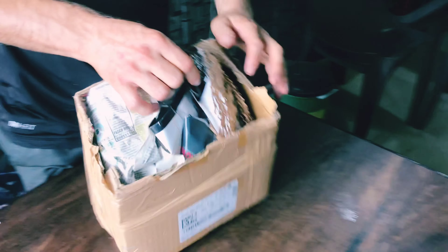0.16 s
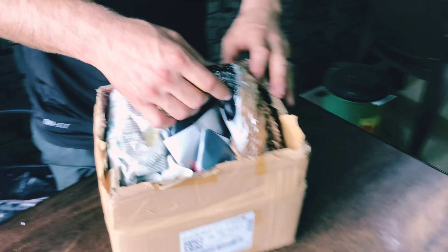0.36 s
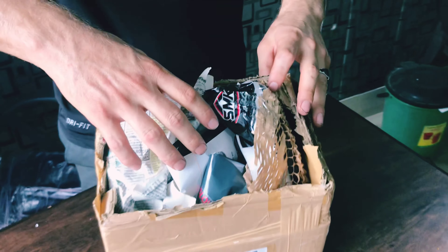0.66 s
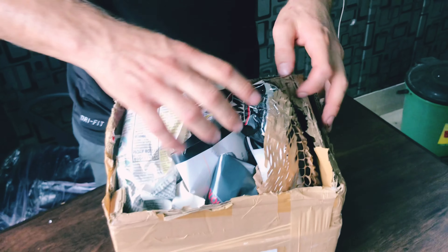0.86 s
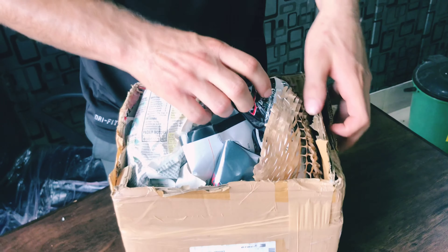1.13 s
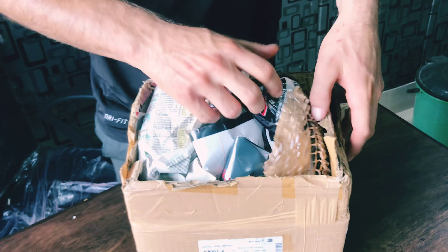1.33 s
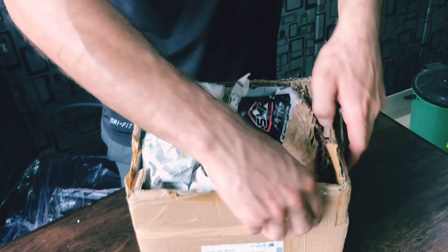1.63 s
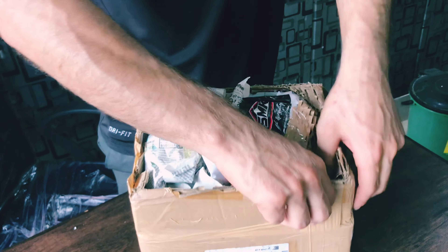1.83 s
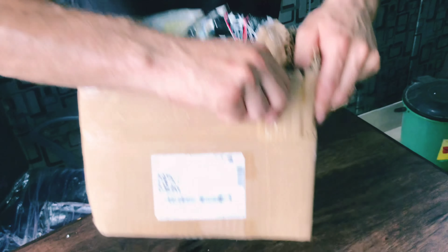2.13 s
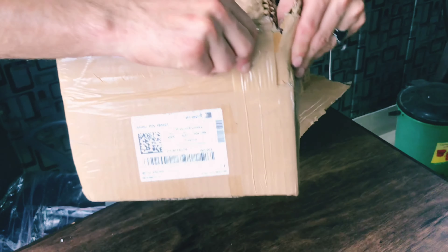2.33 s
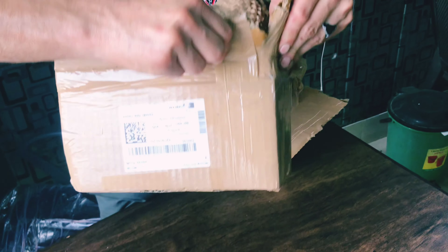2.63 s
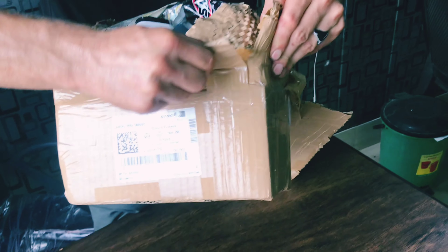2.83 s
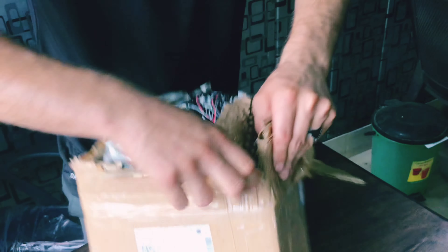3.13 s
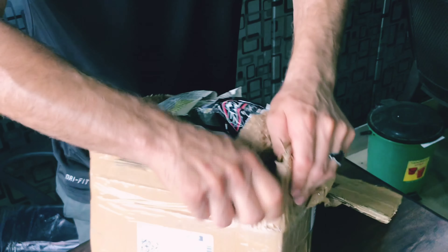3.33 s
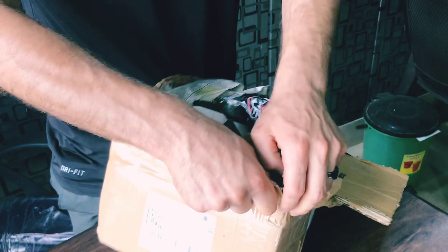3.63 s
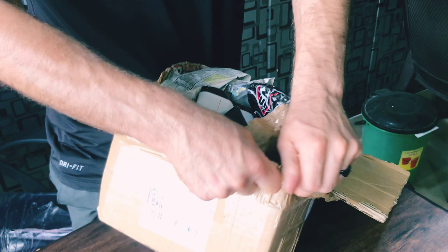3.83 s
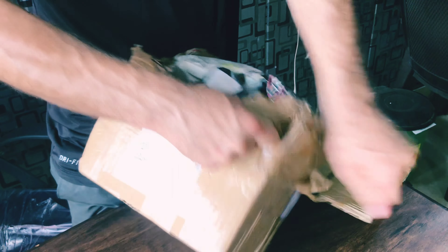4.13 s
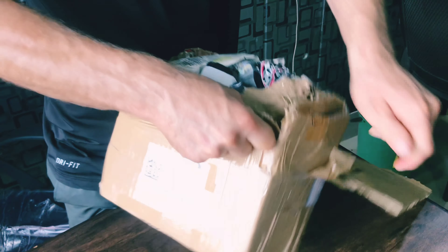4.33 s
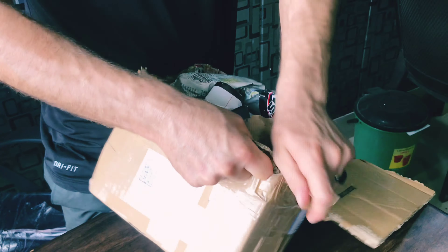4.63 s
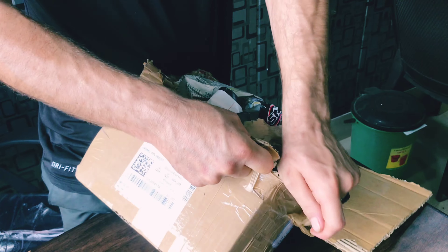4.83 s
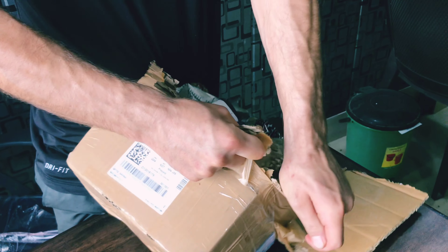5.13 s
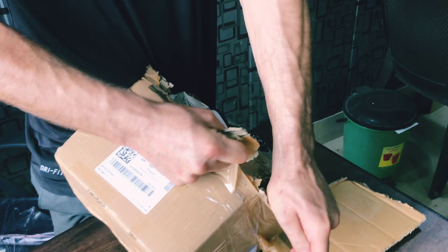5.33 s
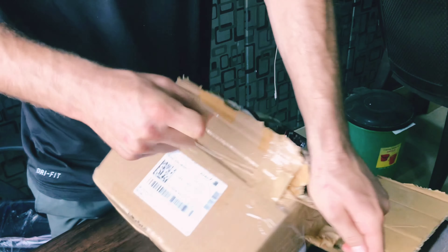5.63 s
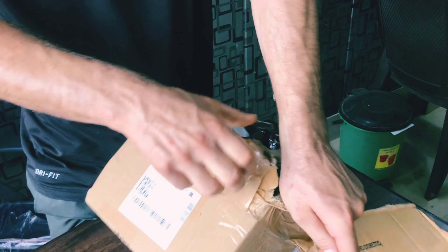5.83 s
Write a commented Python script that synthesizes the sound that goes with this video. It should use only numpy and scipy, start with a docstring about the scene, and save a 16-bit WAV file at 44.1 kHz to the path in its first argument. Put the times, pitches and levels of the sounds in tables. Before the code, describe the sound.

Papery friction and tiny crackles run almost throughout, swelling with each pull. Sharp cardboard snaps cut through, loudest around the middle and near the end, with hollow box booms and soft low table thuds beneath. A close microphone catches short dense room echoes over faint steady rumble and hiss.

```python
"""Sharp snaps over a papery rustle: two hands tear at a taped cardboard box full of newspaper.
The snaps are short noise bursts; the rustle is friction hiss mixed with tiny crackles and dry ticks.
A strip of tape squeals on a wavering tone, and the air in the box booms near 280 Hz.
The wooden table thuds near 90 Hz, its frame rings low, and a small hard room answers with dense
echoes over a faint, steady rumble and hiss."""
import sys
import numpy as np
from scipy import signal
from scipy.io import wavfile
from scipy.ndimage import uniform_filter1d

SR = 44100
rng = np.random.default_rng(int(sys.argv[2]) if len(sys.argv) > 2 else 0)


def unload_wav(signal):
    """Save mono or channel-first audio to the path in sys.argv[1] as 16-bit WAV at rate SR, clipped to [-1, 1]."""
    wavfile.write(
        sys.argv[1],
        SR,
        np.round(np.clip(np.atleast_2d(signal).T, -1, 1) * 32767).astype(np.int16),
    )


N = 263778


def from_db(db):
    """Turn decibels into a plain gain."""
    return 10 ** (np.asarray(db) / 20)


def rms_one(x):
    """Scale a sound to an average strength (rms) of 1."""
    return x / np.sqrt(np.mean(x ** 2) + 1e-20)


def in_time(rows):
    """Draw straight lines between the rows of a table, giving one value a sample for each column."""
    times, *columns = np.transpose(rows)
    return [np.interp(np.arange(N) / SR, times, column) for column in columns]


def band(x, low_hz, high_hz):
    """Keep only one range of pitches, with its top held below the highest pitch the samples can carry."""
    edges = [low_hz, min(high_hz, .45 * SR)]
    return signal.sosfilt(signal.butter(2, edges, "band", fs=SR, output="sos"), x)


def drift(rate_hz):
    """Wander slowly by chance, with spread 1: smoothed noise made at every 40th sample, then filled in."""
    r = np.exp(-80 * np.pi * rate_hz / SR)
    noise = rng.standard_normal(N // 40 + 2002)
    slow = signal.lfilter([1], [1, -2 * r, r * r], noise)[2000:]   # skip the filter's start-up
    return np.interp(np.arange(N) / 40, np.arange(len(slow)), rms_one(slow))


def resonate(x, modes):
    """Ring several modes (f/Hz, width/Hz, level/dB) side by side, signs alternating; peak gain is level + 6 dB."""
    out = 0
    for k, (hz, width_hz, level_db) in enumerate(modes):
        r = np.exp(-np.pi * width_hz / SR)
        feedback = [1, -2 * r * np.cos(2 * np.pi * hz / SR), r * r]
        ringing = signal.lfilter([1 - r * r, 0, r * r - 1], feedback, x)
        out = out + (-1) ** k * from_db(level_db) * ringing
    return out


def add(out, s, sound):
    """Mix a short sound in at time s."""
    i = max(round(s * SR), 0)
    out[i:i + len(sound)] += sound[:N - i]


def burst(noise, low_hz, high_hz, t60_s, level_db):
    """Let noise die away in a band, with its loudest millisecond at the given level."""
    dying = noise * from_db(-60 * np.arange(len(noise)) / SR / t60_s)
    part = band(dying, low_hz, high_hz)
    loudest = np.sqrt(uniform_filter1d(part ** 2, size=44).max())
    return part * from_db(level_db) / loudest


# Fibres and tape letting go; levels are before the body, wall and band gains below.
# Columns: t/s, cardboard body level/dB, body f/Hz, fibre crack level/dB, tape crackle level/dB
SNAP_EVENTS = [(0.0555, -47, 920, -37, -25), (0.117, -19, 1750, -21, -32), (0.198, -49, 1180, -21.5, -30),
               (0.2663, -22, 1090, -14, -11.5), (0.3096, -17, 930, -13.5, -23),
               (0.337, -41, 1410, -30, -39), (0.5296, -54, 2590, -28.5, -30),
               (0.567, -28, 4140, -26, -25.5), (0.601, -23, 990, -22, -19), (0.614, -31, 970, -26.5, -31),
               (0.632, -35, 980, -29, -24), (0.7077, -29, 1800, -26.5, -40),
               (0.7508, -35, 1020, -29.5, -33), (0.7695, -51, 2500, -28, -38), (0.803, -47, 2000, -33, -37),
               (0.868, -40, 950, -41, -36.5), (0.8785, -30.5, 945, -28, -37), (0.9352, -45, 2500, -32, -39),
               (1.0018, -40, 1500, -34, -36), (1.0095, -30, 2010, -28, -39), (1.02, -35, 2590, -27, -33),
               (1.0836, -15.5, 2060, -17, -21.5), (1.1065, -24, 3620, -30, -27),
               (1.146, -29, 1200, -33, -32), (1.1848, -22.5, 1780, -29, -16),
               (1.2472, -47, 2500, -28, -33.5), (1.276, -40, 3000, -30, -28), (1.341, -33, 1020, -44, -28),
               (1.358, -22.5, 1010, -23, -33), (1.372, -40, 2250, -25.5, -27), (1.382, -45, 3000, -31, -34),
               (1.4197, -29, 1260, -28, -27), (1.44, -10.5, 1055, -14, -21), (1.4777, -36, 864, -30, -28.5),
               (1.5528, -34, 1060, -27.5, -28.5), (1.646, -17, 890, -14.5, -23),
               (1.658, -19, 1020, -22, -43), (1.675, -35, 950, -26, -35), (1.7003, -50, 1610, -23.5, -24),
               (1.7399, -16.5, 930, -23, -19.5), (1.8771, -21, 2230, -34, -26),
               (1.933, -47, 1730, -29, -45), (2.0851, -12, 1980, -10, -29), (2.1122, -50, 2440, -23, -37),
               (2.1296, -13.5, 1860, -6.5, -30), (2.2097, -25, 1520, -21, -30.5),
               (2.2688, -23, 2110, -13, -32), (2.287, -48, 2550, -23, -33), (2.354, -22, 940, -20, -30),
               (2.4433, -44, 1980, -56, -26.5), (2.4561, -21.5, 1010, -29, -39),
               (2.4717, -37, 1360, -28, -28), (2.511, -17, 1000, -20, -30), (2.527, -30, 2300, -5, -8.5),
               (2.5374, 2.5, 2070, -0.5, -36), (2.544, -27, 1160, -20, -18),
               (2.7812, -17.5, 1490, -40, -24), (2.814, -17, 1680, -12, -20), (2.827, -8, 2140, -9.5, -13),
               (2.8341, -18, 1000, -7, -19.5), (2.881, -29, 2590, -18, -29),
               (2.8862, -47, 1990, -12.5, -25), (2.9213, -23, 2010, -20, -35), (2.952, -22, 1600, -45, -26),
               (2.972, -30, 1990, -23.5, -28), (3.011, -25.5, 790, -42, -45), (3.0988, -26, 1950, -18, -24),
               (3.1205, -58, 2590, -25, -21.5), (3.1662, -34, 1640, -34, -25.5),
               (3.1924, -52, 2520, -47, -29), (3.224, -25.5, 920, -45, -36), (3.235, -52, 1280, -27, -27),
               (3.284, -32, 880, -31, -30.5), (3.3268, -28.5, 790, -31, -32), (3.415, -18, 2100, -27, -35),
               (3.439, -22, 1060, -30, -42), (3.4975, -26, 1060, -28, -40), (3.52, -51, 2590, -35, -18.5),
               (3.729, -27, 1090, -31, -29), (3.879, -45, 2410, -19, -11.5),
               (3.8972, -40, 3040, -16.5, -13.5), (3.9212, -20, 2000, -9, -3), (3.981, -28, 2020, -15, -16),
               (4.0135, -56, 1610, -30, -16.5), (4.029, -16.5, 1990, -42, -46),
               (4.066, -47, 2400, -25.5, -35), (4.1177, -28, 1900, -19.5, -27),
               (4.137, -22, 2250, -18.5, -28), (4.163, -39, 1540, -16, -20),
               (4.1699, -12.5, 1800, -10, -19.5), (4.187, -21, 1500, -27, -16),
               (4.283, -54, 2440, -16.5, -16.5), (4.2946, -42, 2550, -21, -8), (4.3, -26, 1610, -13.5, -50),
               (4.474, -29, 2070, -30, -35.5), (4.531, -18.5, 1370, -25.5, -40),
               (4.591, -27, 1300, -27, -43), (4.6784, -22.5, 2120, -51, -52), (4.6896, -40, 1360, -23, -35),
               (4.777, -45, 3000, -28, -32), (4.889, -54, 1070, -26, -54), (4.957, -18, 1490, -42, -53),
               (4.9756, -31.5, 700, -34, -27.5), (5.061, -21, 2000, -40, -27),
               (5.067, -29, 3040, -19.5, -25), (5.0782, -15, 1570, -45, -34), (5.0866, -18, 2500, -21, -28),
               (5.186, -17.5, 1470, -36, -48), (5.2029, -13.5, 2160, -8.5, -11),
               (5.224, -33, 2400, -16, -19), (5.264, -44, 1840, -27, -37), (5.285, -16, 1120, -17, -28),
               (5.299, -20, 2590, -41, -29), (5.3386, -10, 1560, -24, -31), (5.3477, -17, 1500, -54, -38),
               (5.3548, -38, 2520, -33, -18), (5.3713, -26, 1700, -34, -26), (5.402, -15, 2070, -19, -29),
               (5.443, -20, 1820, -32, -52), (5.4907, -10.5, 1190, -14, -9.5), (5.502, -13, 960, -30, -26),
               (5.5493, -13.5, 3530, -36, -20), (5.775, -29.5, 810, -25, -31)]
# Pitch ranges of the fibre crack, then of the tape crackle before it is lifted.
# Columns: low f/Hz, high f/Hz, time to fall 60 dB t/s, added level/dB
CRACK_RANGES = [(2270, 7000, 0.018, -2), (5440, 13600, 0.012, 5)]
BODY_T60_S, BODY_SPAN, BODY_DB = 0.019, 1.586, -7   # span: band edges are pitch / span and pitch * span
WALL_SPAN, WALL_T60_S, WALL_DB = 1.1, 0.023, -18   # the narrow ring inside the body sound
# The more tape in a snap, the higher and shorter its crackle.
TAPE_OCTAVES_PER_DB, TAPE_TOP_OCTAVES = 1, 0.83
TABLE_ECHO_S, TABLE_ECHO_DB = 0.0044, -19


def snaps():
    """Filter one noise burst per snap into body, narrow ring, crack and crackle; the table throws it back."""
    out = np.zeros(N)
    noises = rng.standard_normal((len(SNAP_EVENTS), 900))
    noises[:, 0] = 9 * np.sign(noises[:, 0])      # the break itself leads
    lags = TABLE_ECHO_S * rng.uniform(.85, 1.15, len(SNAP_EVENTS))
    for (s, body_db, hz, fibre_db, tape_db), noise, lag in zip(SNAP_EVENTS, noises, lags):
        sound = burst(noise, hz / BODY_SPAN, hz * BODY_SPAN, BODY_T60_S, body_db + BODY_DB)
        sound += burst(noise, hz / WALL_SPAN, hz * WALL_SPAN, WALL_T60_S, body_db + WALL_DB)
        tape_octaves = np.clip(TAPE_OCTAVES_PER_DB * (tape_db - fibre_db), 0, TAPE_TOP_OCTAVES)
        lifts = [1, 2 ** tape_octaves]
        for db, lift, (low, high, t60_s, band_db) in zip([fibre_db, tape_db], lifts, CRACK_RANGES):
            sound += burst(noise, low * lift, high * lift, t60_s / lift, db + band_db)
        add(out, s, sound)
        add(out, s + lag, from_db(TABLE_ECHO_DB) * sound)
    return out


# Fingers never quite leave the paper: a faint rustle between pulls.
# Columns: t/s, level/dB, brightness/dB per octave
FINGER_CREEP = [(0, -42.5, -1), (.5, -47, -0.5), (.92, -48, 0.5), (1.1, -57, 4), (1.45, -39.5, 0),
                (1.6, -69, -1), (2.05, -43, -1.5), (2.4, -41.5, 1.5), (2.72, -49, -1), (3.08, -42, -0.5),
                (3.3, -41, -0.5), (3.7, -50.5, 1.5), (3.85, -37, -2.5), (4.1, -45.5, 4.5), (4.5, -61, -14),
                (4.75, -49.5, 4.5), (5.3, -41.5, 5.5), (5.64, -49, -1.5), (5.86, -41.5, -2),
                (5.98, -56.5, -2)]
# Each pull, rip or squeeze swells and fades.
# Columns: peak t/s, peak level/dB, swell t/s, fade t/s, brightness/dB per octave
HAND_PULLS = [(.1, -32.5, 0.25, 0.11, -1), (.315, -33.5, 0.25, 0.23, -1), (.566, -37.5, 0.19, 0.045, 0),
              (.703, -40, 0.15, 0.052, -0.5), (.87, -49, 0.18, 0.12, -7), (1.013, -38, 0.074, 0.12, 0),
              (1.179, -37, 0.3, 0.043, -2.5), (1.37, -42.5, 0.65, 0.26, -3.5),
              (1.526, -39, 0.024, 0.023, -1), (1.654, -32.5, 0.034, 0.25, -3.5),
              (1.709, -27, 0.081, 0.046, -1), (1.916, -37, 0.082, 0.13, -4),
              (2.094, -36.5, 0.028, 0.23, -1), (2.275, -26.5, 0.026, 0.047, -0.5),
              (2.535, -14.5, 0.0096, 0.099, -0.5), (2.784, -19, 0.0048, 0.011, -1),
              (2.828, -26.5, 0.064, 0.2, 1.5), (3.335, -37.5, 0.051, 0.11, -1),
              (3.419, -28, 0.037, 0.074, -3.5), (3.517, -33.5, 0.053, 0.064, 0.5),
              (3.732, -30.5, 0.0041, 0.043, -2), (3.778, -31.5, 0.03, 0.015, 0),
              (3.917, -44, 0.11, 0.4, 6.5), (4.18, -22.5, 0.068, 0.06, 0.5), (4.293, -36.5, 0.35, 0.21, -1),
              (4.533, -43.5, 0.0082, 0.7, -3.5), (4.684, -40.5, 0.19, 0.33, -0.5),
              (4.959, -36, 0.081, 0.1, -0.5), (5.078, -32.5, 0.087, 0.18, -1),
              (5.21, -21, 0.042, 0.052, 0.5), (5.35, -31, 0.075, 0.089, -6), (5.493, -20, 0.038, 0.019, 1),
              (5.562, -27, 0.2, 0.074, -2)]
SWING_DB = 20   # gained over a swell, lost over a fade


def hands():
    """Add the power of pulls and creep into one rustle level; stronger parts weigh more in its brightness."""
    creep_db, creep_tilt = in_time(FINGER_CREEP)
    power = from_db(2 * creep_db)
    weighted_tilt, t = power * creep_tilt, np.arange(N) / SR
    for s, db, swell_s, fade_s, bright in HAND_PULLS:
        near = slice(max(round((s - 2 * swell_s) * SR), 0), round((s + 2 * fade_s) * SR))
        away = np.maximum((s - t[near]) / swell_s, (t[near] - s) / fade_s)
        part = from_db(2 * (db - SWING_DB * away))
        power[near] += part
        weighted_tilt[near] += part * bright
    return 10 * np.log10(power), weighted_tilt / power


# How strong the rustle is at each pitch, before brightness and the broad hump are added.
# Columns: f/Hz, level/dB per Hz
RUSTLE_COLOUR = [(520, -12), (800, 0), (1000, -1), (1400, -4), (2200, -0.5), (3400, 1.5), (5000, -2),
                 (9000, -1), (15000, -1.5)]
HUMP_HZ, HUMP_OCTAVES = 900, 2   # centre and spread of a broad hump in the rustle
HUMP_DB, HUMP_PER_BRIGHTNESS = 3, 0.14   # height at brightness 0; the hump is fuller when brighter
GRAIN_DB = -3
GRAIN_MERGE = .6   # dB of graininess lost per dB above TICK_TOP_DB: a hard rip blurs
TICK_TOP_DB = -38   # ticks grow with the rustle up to this level, then drown in it


def rustle(level_db, tilt):
    """Rub paper and board: clumped tiny crackles roughen a friction hiss, built in half-octave bands."""
    hump_db = HUMP_DB + HUMP_PER_BRIGHTNESS * tilt
    grain_db = GRAIN_DB - GRAIN_MERGE * np.maximum(level_db - TICK_TOP_DB, 0)
    born = rng.random(N) < 360 * from_db(5 * drift(15)) / SR   # 360 a second before clumping
    sizes = from_db(7.0 * np.minimum(rng.exponential(1, N), 3)) * born
    puffs = signal.lfilter([1], [1, -.96], sizes)      # every crackle lasts about a millisecond
    hiss = rng.standard_normal((2, N)) * (1 + from_db(grain_db) * rms_one(puffs))
    out, together, edges = 0, drift(20), 400 * 2 ** np.arange(0, 5.6, .5)
    points = np.array(RUSTLE_COLOUR)
    for k, (low, high) in enumerate(zip(edges, edges[1:])):
        hz = np.sqrt(low * high)
        colour_db = np.interp(np.log(hz), np.log(points[:, 0]), points[:, 1])
        colour_db = colour_db + tilt * np.log2(hz / 4000)
        octaves_away = np.log2(hz / HUMP_HZ)
        colour_db += hump_db * np.exp(-(octaves_away / HUMP_OCTAVES) ** 2)
        patchy_db = 1.5 * (together + 0.15 * drift(6.3))
        out = out + from_db(colour_db + patchy_db) * band(hiss[k % 2], low, high)
    # even out the strength over a quarter second, then apply the hands' level
    return from_db(level_db) * out / np.sqrt(uniform_filter1d(out ** 2, size=SR // 4))


# The parts of a tick, low to high; all share a further 8 dB cut.
# Columns: low f/Hz, high f/Hz, level/dB over the rustle before that cut
TICK_RANGES = [(640, 2900, -8.5), (2020, 7240, -7), (5250, 10900, -3.5), (7550, 23000, -11)]
TICKS_PER_S, TICK_SPREAD_DB, TICK_CLUMP_DB = 90, 5, 5   # the rate is before clumping


def ticks(rustle_db):
    """Part single fibres with dry clicks, in clumps; chance band levels give each its own colour."""
    level_db = np.minimum(rustle_db, TICK_TOP_DB)
    born = np.flatnonzero(rng.random(N) < TICKS_PER_S * from_db(TICK_CLUMP_DB * drift(12)) / SR)
    sizes = from_db(TICK_SPREAD_DB * np.minimum(rng.exponential(1, len(born)), 2.5))
    sizes = sizes * rng.choice([-1, 1], len(born))
    out = 0
    for low_hz, high_hz, db in TICK_RANGES:
        clicks = np.full(N, 1e-18)
        clicks[born] = sizes * from_db(3.5 * rng.standard_normal(len(born)))
        out = out + from_db(db - 8.0) * rms_one(band(clicks, low_hz, high_hz))
    return from_db(level_db) * out


# A strip of tape drags and scrapes as it stretches; its level also flutters by chance.
# Columns: t/s, level/dB, f/Hz
TAPE_SCRAPE = [(4.022, -70, 1960), (4.03, -47, 1930), (4.05, -55, 1820), (4.11, -51, 1800),
               (4.145, -40, 1820), (4.185, -38, 1800), (4.2, -70, 1780)]
SCRAPE_WOBBLE_HZ, SCRAPE_LUMPY_DB = 220, 4


def scrape():
    """Squeal roughly as the tape slackens: a mostly sagging tone, shaken by two random drifts."""
    db, hz = in_time(TAPE_SCRAPE)
    turn = 2 * np.pi * np.cumsum(hz) / SR
    squeal = drift(SCRAPE_WOBBLE_HZ) * np.sin(turn) + drift(SCRAPE_WOBBLE_HZ) * np.cos(turn)
    return from_db(db + SCRAPE_LUMPY_DB * drift(25)) * squeal


def blows(events, t60_s, rise_s, gain_db):
    """Set one low mode ringing with a soft push: a damped sine with a rounded start."""
    out, t = np.zeros(N), np.arange(SR) / SR
    shape = (1 - np.exp(-t / rise_s)) * from_db(-60 * t / t60_s)
    for s, db, hz in events:
        add(out, s, from_db(db + gain_db) * shape / shape.max() * np.sin(2 * np.pi * hz * t))
    return out


def rubbing(modes, level_db, lumpy_db):
    """Shake a body with lumpy noise by sliding and squeezing; the modes act twice, so valleys stay dark."""
    shaken = resonate(resonate(rng.standard_normal(N), modes), modes)
    return from_db(level_db + lumpy_db * drift(10.5)) * rms_one(shaken)


# Walls flex and the air in the box answers; BOOM_DB is added to each level.
# Columns: t/s, level/dB, f/Hz
BOX_BOOMS = [(0.06, -34.5, 258), (0.1, -34.5, 336), (0.2, -40.5, 326), (0.24, -35, 190), (0.337, -33, 265),
             (0.395, -38.5, 255), (0.855, -40, 317), (1.109, -35.5, 264), (1.254, -37, 235),
             (1.441, -31.5, 287), (1.645, -31.5, 320), (1.719, -30, 278), (2.092, -30, 275),
             (2.135, -34, 287), (2.272, -25, 298), (2.357, -30, 280), (2.513, -25, 251), (2.528, -34, 290),
             (2.539, -19, 299), (2.61, -30.5, 322), (2.73, -35, 295), (2.784, -28.5, 288), (3.13, -36, 248),
             (3.155, -36, 318), (3.234, -34, 194), (3.328, -28.5, 292), (3.388, -21.5, 244),
             (3.472, -22.5, 280), (3.502, -24.5, 250), (3.731, -37, 244), (3.762, -30, 295),
             (3.88, -35, 273), (4.07, -41, 278), (4.164, -35, 436), (4.175, -29.5, 256),
             (4.189, -20.5, 270), (4.223, -34, 425), (4.283, -28, 293), (4.402, -34, 300),
             (4.615, -28.5, 295), (4.86, -30, 248), (4.935, -33, 229), (4.961, -25, 270),
             (5.057, -23.5, 235), (5.082, -20, 270), (5.151, -26.5, 245), (5.187, -22.5, 268),
             (5.208, -34, 238), (5.283, -33, 234), (5.322, -28.5, 260), (5.339, -20.5, 270),
             (5.446, -24.5, 219), (5.49, -23, 354), (5.4918, -12, 240), (5.551, -17, 277),
             (5.585, -24, 200), (5.778, -37, 228)]
# Resonances of the air in the box, for one of the two filter passes.
# Columns: f/Hz, width/Hz, level/dB
BOX_AIR_MODES = [(182, 52, -6.5), (236, 39.8, -4.5), (278, 25.5, -1.35), (349, 78, -4.5), (490, 285, -11.5)]
BOOM_T60_S, BOOM_RISE_S, BOOM_DB = 0.031, .005, 1.5
HUM_DB, USUAL_RUSTLE_DB = -51, -41.5   # box air level at the usual shove and usual rustle
HUM_FOLLOWS, GRIP_SHARE = 0.2, .55   # shares of the shove's and the rustle's swing in the box air


def box_air(shove_db, rustle_db):
    """Boom as the walls flex, and hum as sliding and busy fingers shake the box."""
    hum_db = HUM_DB + HUM_FOLLOWS * shove_db + GRIP_SHARE * (rustle_db - USUAL_RUSTLE_DB)
    booms = blows(BOX_BOOMS, BOOM_T60_S, BOOM_RISE_S, BOOM_DB)
    return booms + rubbing(BOX_AIR_MODES, hum_db, lumpy_db=3.5)


# The box strikes the table top; THUD_DB is added to each level.
# Columns: t/s, level/dB, f/Hz
TABLE_THUDS = [(0.059, -41.5, 95), (0.239, -25, 90.5), (0.396, -31, 84), (0.875, -46, 79), (0.951, -47, 89),
               (1.079, -40, 91), (1.704, -39, 89), (1.75, -37, 87), (1.886, -41, 86), (2.541, -37, 137),
               (3.244, -30.5, 89), (3.502, -16, 86), (3.735, -35.5, 110), (3.881, -42.5, 99),
               (4.068, -30, 92), (4.182, -29, 119), (4.4, -38, 138), (4.722, -40, 85.6), (4.855, -33, 100),
               (4.936, -28.5, 106), (4.97, -35, 98), (5.056, -27.5, 101), (5.085, -42, 111),
               (5.158, -32, 120), (5.201, -30, 102), (5.339, -35, 96), (5.4934, -10, 103.6),
               (5.5626, -12.5, 85.5), (5.786, -27.5, 85)]
# Resonances of the table top, for one of the two filter passes.
# Columns: f/Hz, width/Hz, level/dB
TABLE_TOP_MODES = [(95.3, 32, 6.5), (130, 56, 3)]
THUD_T60_S, THUD_RISE_S, THUD_DB = 0.097, 0.012, 1


def table_top(rumble_db):
    """Thud when the box strikes the wood, and rumble when it slides or presses."""
    thuds = blows(TABLE_THUDS, THUD_T60_S, THUD_RISE_S, THUD_DB)
    return thuds + rubbing(TABLE_TOP_MODES, rumble_db, lumpy_db=4.5)


# Resonances of the table frame, for one of the two filter passes.
# Columns: f/Hz, width/Hz, level/dB
FRAME_MODES = [(35, 22, -25), (67.5, 19, 15)]
# The frame rings on after each thud, at one pitch.
FRAME_HZ, FRAME_T60_S, FRAME_RISE_S, FRAME_DB = 61, 1.3, .03, -26
# Sway at the usual shove, its share of the shove's swing, and the hum at rest.
SWAY_DB, SWAY_FOLLOWS, SWAY_REST_DB = -66, 0.5, -61


def table_frame(shove_db):
    """Ring long and low after each thud; the powers of sway and resting hum add up."""
    sway_power = from_db(2 * (SWAY_DB + SWAY_FOLLOWS * shove_db))
    sway_db = 10 * np.log10(from_db(2 * SWAY_REST_DB) + sway_power)
    hits = [(s, db, FRAME_HZ) for s, db, _ in TABLE_THUDS]
    ringing = blows(hits, FRAME_T60_S, FRAME_RISE_S, FRAME_DB)
    return ringing + rubbing(FRAME_MODES, sway_db, lumpy_db=0.5)


# The room's steady rumble and hiss; the two levels count against each other.
# Columns: f/Hz, width/Hz, level/dB
STILL_AIR_MODES = [(28, 42, -6), (1190, 920, -13)]
STILL_AIR_DB = -55.5


def still_air():
    """Keep a steady rumble and hiss in the room: noise through two broad resonances."""
    return from_db(STILL_AIR_DB) * rms_one(resonate(rng.standard_normal(N), STILL_AIR_MODES))


# How the room answers in each pitch range; levels count against each other.
# Columns: low f/Hz, high f/Hz, time to fall 60 dB t/s, level/dB per Hz
ROOM_RANGES = [(199, 600, 0.35, 9), (605, 1260, 0.33, 3), (1480, 2470, 0.41, 4.5), (2520, 7260, 0.53, 0.5),
               (5440, 6300, 0.2, 2), (10100, 40000, 0.1, 1)]
ROOM_DB, ROOM_BUILD_S = -13, 0.0014


def room(x):
    """Spread a sound into dense echoes that build up in a few milliseconds and die band by band."""
    t = np.arange(SR // 2) / SR
    noise = rng.standard_normal(len(t))
    echoes = np.zeros(len(t))
    for low, high, t60_s, db in ROOM_RANGES:
        fading = np.sqrt(high - low) * from_db(db - 60 * t / t60_s)
        echoes += rms_one(band(noise, low, high)) * fading
    echoes *= 1 - np.exp(-(t / ROOM_BUILD_S) ** 2)
    echoes /= np.sqrt(np.sum(echoes ** 2))
    return from_db(ROOM_DB) * signal.fftconvolve(x, echoes)[:N]


# The box slides and presses on the table.
# Columns: t/s, table rumble level/dB
BOX_SHOVES = [(0, -53), (.21, -60), (.3, -40.5), (.55, -55), (.81, -69), (1.12, -52.5), (1.58, -61),
              (1.74, -57), (1.82, -50.5), (2.21, -60), (2.82, -67), (3.0, -63), (3.37, -59), (3.55, -34.5),
              (3.71, -53), (4.05, -58), (4.19, -44), (4.42, -46), (4.82, -64), (4.95, -50.5), (5.46, -40),
              (5.58, -32), (5.66, -43.5), (5.98, -63)]
USUAL_SHOVE_DB = -59


def scene():
    """Let the hands drive the rustle and the shoves drive box and table, then add the room's answer."""
    rumble_db, = in_time(BOX_SHOVES)
    shove_db = rumble_db - USUAL_SHOVE_DB
    rustle_db, tilt = hands()
    sharp = snaps() + rustle(rustle_db, tilt) + ticks(rustle_db) + scrape()
    box = box_air(shove_db, rustle_db)
    table = table_top(rumble_db) + table_frame(shove_db)
    return (sharp + box + table + still_air() + room(sharp + 0.54 * box))[None]


MIC_LOW_HZ, CUTOFF_HZ = 33.5, 16250
MIC_DIP_HZ, MIC_DIP_WIDTH_HZ, MIC_DIP_SHARE = 10540, 840, 0.51   # share taken out at the centre


def record(dry):
    """Lose the deepest bass and dip near 10 kHz in the microphone; round the peaks and cut the top."""
    dry = signal.sosfilt(signal.butter(2, MIC_LOW_HZ, "high", fs=SR, output="sos"), dry)
    unity_db = -20 * np.log10(2)   # undoes the resonance's doubling at its peak
    dipped = dry - MIC_DIP_SHARE * resonate(dry, [(MIC_DIP_HZ, MIC_DIP_WIDTH_HZ, unity_db)])
    rounded = 1.15 * np.tanh(dipped / 1.15)
    return signal.sosfilt(signal.cheby2(18, 70, CUTOFF_HZ, fs=SR, output="sos"), rounded)


dry = scene()
out = record(dry)
unload_wav(out)
```